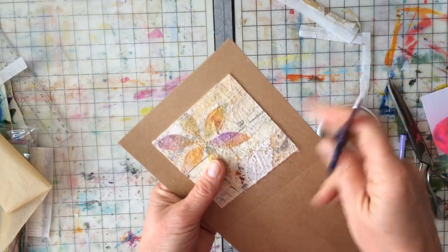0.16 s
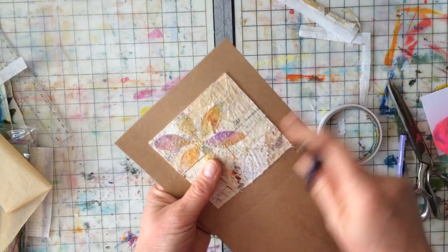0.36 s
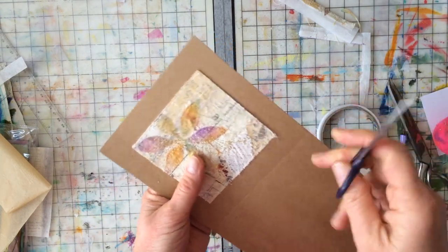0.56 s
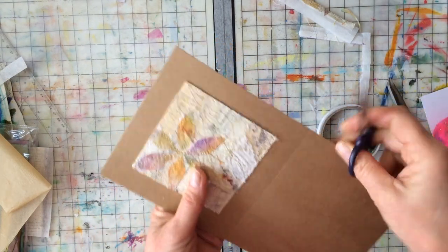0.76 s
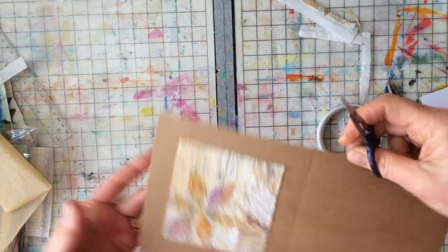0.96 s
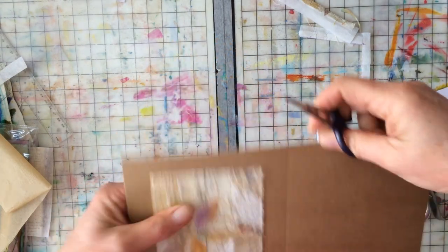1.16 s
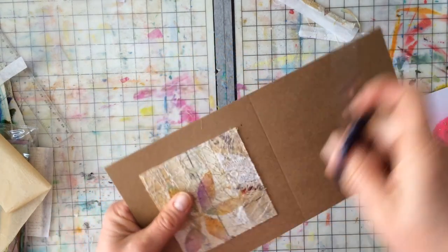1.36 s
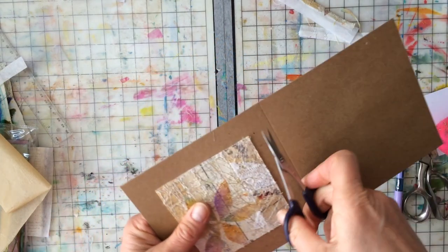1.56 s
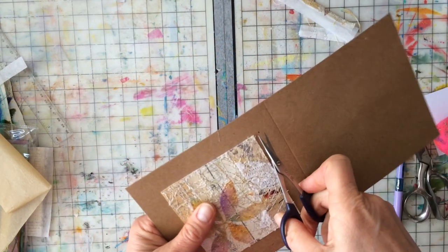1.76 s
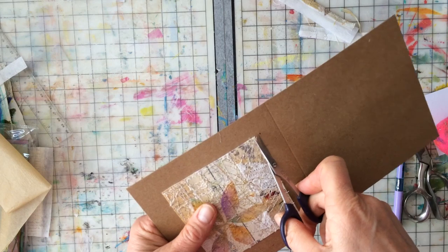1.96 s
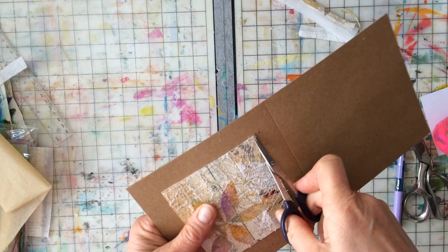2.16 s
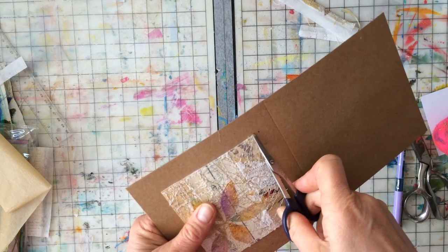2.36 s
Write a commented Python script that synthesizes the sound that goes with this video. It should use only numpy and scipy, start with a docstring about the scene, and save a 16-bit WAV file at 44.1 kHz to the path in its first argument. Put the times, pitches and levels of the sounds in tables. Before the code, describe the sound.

Close up in a quiet room, a card edge bumps and rubs against a cutting mat, hollow and papery, then brushes lightly, knocks once more, and ends with sparse, very faint small scissor and card clicks.

```python
"""In a quiet room, a hand turns a stiff card on a cutting mat and brings small scissors to the cloth on it.
The card edge knocks, scrapes and booms on the table: contact pulses and random jolts ring its resonances.
It slides with a dry hiss, made of dense random slips coloured by a spectrum.
Short bursts of bright noise make the scissor ticks and the sharp top of a hard card knock.
A short dull room tail and steady air and hiss lie behind.
"""
import sys
import numpy as np
from scipy import signal
from scipy.fft import rfft, irfft
from scipy.io import wavfile
from scipy.ndimage import uniform_filter1d

SR = 44100
rng = np.random.default_rng(int(sys.argv[2]) if len(sys.argv) > 2 else 0)


def dump_mix(stems):
    """Bounce the given channels to the path in sys.argv[1] as a 16-bit WAV at rate SR."""
    frames = np.atleast_2d(stems).T  # one column per channel
    limited = np.clip(frames, -1, 1)  # hard clip at full scale
    pcm = np.round(limited * 32767).astype(np.int16)
    wavfile.write(sys.argv[1], SR, pcm)


def volts_from_db(level):
    """Convert decibel levels to linear amplitude ratios."""
    exponent = np.asarray(level, float) / 20
    return 10 ** exponent


N = 105840  # 2.4 s

# Card edge dragged over the mat or pressed by the blades, one gain curve a bump:
# time_s, flexing_db, bend_hz, grain_db, scrape_db
BUMPS = [
    [(0.239, -38, 300, -37.5, -39), (0.262, -33.5, 192, -38.5, -38.5), (0.28, -40, 182, -58.5, -56),
     (0.29, -32, 605, -42, -57.5), (0.318, -43, 293, -64, -68), (0.33, -45, 176, -67, -86),
     (0.34, -64, 152, -70, -69), (0.352, -68, 333, -92, -79), (0.38, -64, 353, -72, -98)],
    [(0.452, -33, 237, -47.5, -60), (0.472, -39, 227, -54, -43.5), (0.49, -34.5, 230, -45, -50.5),
     (0.504, -39, 412, -54, -71), (0.514, -41.5, 290, -87, -64), (0.522, -42, 293, -52, -67),
     (0.55, -50, 163, -98, -82), (0.56, -56, 285, -82, -79), (0.584, -78, 310, -103, -77)],
    [(0.8, -76, 313, -70, -88), (0.81, -53.5, 312, -63, -74), (0.826, -81, 280, -75, -73),
     (0.844, -51, 260, -47.5, -63), (0.858, -49.5, 270, -63, -74), (0.876, -68, 308, -67.5, -63),
     (0.89, -60, 368, -58, -73), (0.9, -76, 382, -63, -86)],
    [(1.269, -50.5, 196, -60, -54), (1.295, -41.5, 336, -39, -45), (1.309, -44.5, 153, -61.5, -56),
     (1.329, -75, 149, -57.5, -62), (1.355, -69, 272, -86, -82), (1.37, -73, 274, -80, -84)],
    [(1.72, -61, 392, -49, -87), (1.728, -62, 435, -53, -69.5), (1.752, -63.5, 500, -61, -73),
     (1.768, -65, 487, -63.5, -72.5), (1.792, -60.5, 465, -69, -86), (1.81, -71, 413, -68, -75),
     (1.827, -99, 400, -89, -94)],
    [(2.15, -72, 292, -88, -80), (2.206, -69.5, 287, -66.5, -92), (2.236, -76, 268, -113, -102),
     (2.25, -62, 250, -64, -88), (2.286, -84, 273, -107, -92), (2.298, -65, 283, -69.5, -87),
     (2.33, -70, 281, -78, -88), (2.342, -63, 285, -65, -74), (2.366, -63.5, 250, -92.5, -99), ],
]
# Card and fingers sliding lightly, one gain curve a stroke: time_s, hiss_db, rumble_db
SLIDES = [
    [(0.6, -81, -90), (0.616, -68.5, -74), (0.656, -61, -76), (0.666, -57, -85), (0.694, -65, -73),
     (0.712, -62.5, -91), (0.726, -76, -102), (0.8, -65, -92)],
    [(0.89, -60, -62), (0.908, -63.5, -69), (0.938, -54.5, -77), (0.956, -51.5, -58), (0.978, -54, -76),
     (0.996, -49.5, -72), (1.025, -53, -72), (1.066, -48, -64.5), (1.086, -66, -76), (1.14, -66, -67)],
    [(1.14, -71, -80), (1.256, -51, -71.5), (1.262, -60, -78), (1.275, -42, -55)],
    [(1.41, -89, -79), (1.446, -64, -83), (1.47, -73.5, -100), (1.48, -74.5, -72.5), (1.548, -66.5, -81),
     (1.564, -65, -83), (1.592, -77, -76), (1.63, -96, -103)],
    [(1.9, -96, -76), (1.98, -73.5, -80), (2.05, -86, -78)],
]
# Blows on the card: start_s, swing_peak_db, contact_s, boom_peak_db, bend_hz
KNOCKS = [(0.2389, -27, 0.00012, -31.5, 330), (0.276, -37, 0.0003, -27, 510),
          (0.2866, -34.5, 0.00011, -37.5, 593), (0.306, -49, 0.00054, -41.5, 179),
          (0.3150, -60, 0.00032, -46.5, 316), (0.4506, -31.5, 0.00018, -33, 356),
          (0.4593, -31.5, 0.0002, -49, 513), (0.4938, -34.5, 0.00032, -27.5, 530),
          (0.5048, -68, 0.00066, -35.5, 184), (.5335, -55, 0.00047, -50.5, 182),
          (.818, -48.5, 0.0011, -56.5, 193), (.843, -42, 0.000065, -64, 200),
          (1.1064, -45, 0.00011, -74, 293), (1.2695, -49, 0.00033, -56, 300),
          (1.2940, -30, 0.000051, -43, 153), (1.7110, -54.5, 0.00014, -69, 298),
          (1.7189, -38.5, 0.00013, -59, 410), (1.748, -70, 0.00022, -57.5, 496),
          (2.204, -60, 0.000096, -61, 230), (2.248, -63.5, 0.00019, -61, 230),
          (2.340, -60.5, 0.0002, -56, 280)]
# Bright ticks: scissor blades and pivot, and the sharp top of a hard card knock:
# start_s, level_db, centre_hz
BRIGHT_TICKS = [(0.023, -56, 13400), (0.0748, -57.5, 6790), (0.2669, -32.5, 4400), (0.2868, -39, 4530),
                (0.3372, -48.5, 6240), (0.4883, -28, 6400), (0.5590, -41.5, 6100), (0.7099, -42, 14200),
                (0.87, -58, 13000), (1.294, -30.5, 4900), (1.514, -62, 3700), (1.9819, -60, 4240)]
# Low modes of the card on the table: pitch_hz, width_hz, level_db
BOOM_MODES = [(54, 38, -4.5), (98.7, 20, -2.5), (155.7, 18.5, 6.5), (187.4, 23.5, 2), (230, 22.3, 3),
              (287, 24.7, 0), (335, 36.3, -1), (454, 35, 2), (510, 34, -3.5), (608, 82, -8)]
# Middle and high modes of the card: pitch_hz, width_hz, level_db
CARD_MODES = [(780, 60, -0.5), (922, 103, 3), (1085, 198, 7.5), (1277, 180, 4.5), (1548, 114, 1.5),
              (1798, 190, 0.5), (2303, 13, 5.5), (3030, 820, -15), (4100, 570, -8)]
# Colour of the scraping edge, relative density per Hz: pitch_hz, level_db
SCRAPE_COLOUR = [(1290, -57), (2200, -3), (2750, -8.5), (3090, -1.5), (3440, -11), (5170, -6), (7970, -8),
                 (9410, -11), (16000, -15)]
# Colour of the light sliding, relative density per Hz: pitch_hz, level_db
HISS_COLOUR = [(290, -19), (500, -10.5), (750, -12), (1030, 3), (1380, -8), (1570, -1), (2610, -5.5),
               (6610, -6), (9090, -10), (14700, -12.5), (16000, -7.5)]
# Colour of the room air and microphone hiss, relative density per Hz: pitch_hz, level_db
AIR_COLOUR = [(26, -13), (45, 1.5), (251, -9.5), (411, -13), (525, -17.5), (656, -15), (1050, -16),
              (1370, -19), (3240, -24.5), (3490, -24), (16000, -31)]

JOLTS_PER_S, JOLT_SPREAD_DB, JOLT_TOP_HZ = 250, 3.0, 1110
BEND_OCTAVES, BEND_LIFT_DB = 0.3, 10.5  # modes near the bend pitch ring louder
RING_DB, RING_S = -11, 0.0061
HARD_CONTACT_S = 0.0001  # contacts longer than this give more ring against the click
CRACK_DB, CRACK_S = -11, 0.002
SLIPS_PER_S, SLIP_SPREAD_DB = 24000, 1.5
CATCHES_PER_S, CATCH_SPREAD_DB = 1500, 1.5
CATCH_SHARE = 0.35  # coarse catches against fine slips
PATCH_DB = 2.6
BLADE_HZ, BLADE_WIDTH_HZ, BLADE_DB = 7760, 26, -19.5
TICK_S, TICK_WIDTH, TICK_WIDE_DB = 0.0016, 0.24, -1.5  # width as a share of the centre pitch
ROOM_DB, ROOM_T60_S, ROOM_TOP_HZ = -18, 0.1, 5360
AIR_DB = -70
BASS_CUT_HZ, EDGE_HZ = 48, 15900


def flexing():
    """Soft jolts set the card booming; its bend decides which low modes speak."""
    jolts = clicks(JOLTS_PER_S, JOLT_SPREAD_DB) + 0.33 * rng.standard_normal(N)
    jolts = signal.sosfilt(signal.butter(4, JOLT_TOP_HZ, fs=SR, output="sos"), jolts)
    modes = body(jolts, BOOM_MODES)
    rows = np.concatenate(BUMPS)
    bend_hz = np.interp(np.arange(N) / SR, rows[:, 0], rows[:, 2])
    boom = steady(evened(bent(modes, bend_hz)), size=900)
    rumble = evened(modes.sum(0))
    return level(BUMPS, axis=1) * boom + level(SLIDES, axis=2) * rumble


def bent(modes, bend_hz):
    """Sums the low modes, lifting those near the bend pitch."""
    octaves_off = np.log2(np.array(BOOM_MODES)[:, :1] / bend_hz)
    lift = volts_from_db(BEND_LIFT_DB * np.exp(-(octaves_off / BEND_OCTAVES) ** 2))
    return (modes * lift).sum(0)


def knocks():
    """Each blow is one swing of pressure scaled by the contact time, a crack, the card's ring and its boom."""
    out, t = np.zeros(N), np.arange(5000) / SR
    noises = rng.standard_normal((len(KNOCKS), 5000))
    for (s, swing_db, contact, boom_db, bend_hz), noise in zip(KNOCKS, noises):
        u = t / contact - 4  # the push peaks four contact times in
        push = np.exp(-u ** 2 / 2)
        swing = u * np.exp(0.5 - u ** 2 / 2)  # peaks at 1
        ring = body(push * (1 + 0.13 * noise), CARD_MODES).sum(0)
        ring = ring / abs(ring).max() * np.exp(-t / RING_S)
        ring_gain = volts_from_db(RING_DB) * np.sqrt(contact / HARD_CONTACT_S)
        # a longer contact dulls the crack
        soft = np.exp(-1 / (contact * SR))
        crack = evened(signal.lfilter([1], [1, -2 * soft, soft ** 2], noise)) * np.exp(-t / CRACK_S)
        hit = swing + ring_gain * ring + volts_from_db(CRACK_DB) * crack
        boom = bent(body(push, BOOM_MODES), bend_hz)
        add(out, s, volts_from_db(swing_db) * hit + volts_from_db(boom_db) * boom / abs(boom).max())
    return out


def scraping():
    """Coarse catches ring the card's middle modes; fine slips hiss on top and make a blade sing faintly."""
    catches = clicks(CATCHES_PER_S, CATCH_SPREAD_DB)
    grain = steady(evened(body(catches, CARD_MODES).sum(0)), size=500)
    slips = fibres()
    blade = evened(resonate(slips, BLADE_HZ, BLADE_WIDTH_HZ))
    fine = patchy(coloured(slips, SCRAPE_COLOUR)) + volts_from_db(BLADE_DB) * blade
    return level(BUMPS, axis=3) * grain + level(BUMPS, axis=4) * fine


def bright_ticks():
    """Scissor steel or the top of a hard card knock: brief bright noise, part around one centre and part wide."""
    out, t = np.zeros(N), np.arange(1500) / SR
    noises = rng.standard_normal((len(BRIGHT_TICKS), 1500))
    for (s, db, hz), noise in zip(BRIGHT_TICKS, noises):
        centred = evened(resonate(noise, hz, TICK_WIDTH * hz))
        wide = evened(np.diff(noise, prepend=0))
        fizz = centred + volts_from_db(TICK_WIDE_DB) * wide
        add(out, s, volts_from_db(db) * 0.5 * fizz * np.exp(-t / TICK_S))
    return out


def sliding():
    """Dense light slips between card, skin and mat."""
    return level(SLIDES, axis=1) * patchy(coloured(fibres(), HISS_COLOUR))


def fibres():
    """Dense fine slips with coarser catches among them."""
    return clicks(SLIPS_PER_S, SLIP_SPREAD_DB) + CATCH_SHARE * clicks(CATCHES_PER_S, SLIP_SPREAD_DB)


def patchy(x):
    """Uneven fibres make the colour of a rub drift in random patches."""
    z = signal.stft(x, nperseg=256)[2]
    patches = uniform_filter1d(rng.standard_normal(z.shape), size=3, axis=0)  # across pitch
    patches = evened(uniform_filter1d(patches, size=14, axis=1))  # across time
    return evened(signal.istft(z * volts_from_db(PATCH_DB * patches), nperseg=256)[1][:N])


def room(x):
    """Table and walls return a short dull tail of decaying noise."""
    t = np.arange(SR // 3) / SR
    noise = signal.lfilter(*signal.butter(1, ROOM_TOP_HZ, fs=SR), rng.standard_normal(len(t)))
    tail = noise * volts_from_db(-60 * t / ROOM_T60_S) * (t > 0.004)  # a 4 ms gap comes first
    return volts_from_db(ROOM_DB) * signal.fftconvolve(x, tail / np.linalg.norm(tail))[:N]


def air():
    """Steady room air and microphone hiss, as coloured noise."""
    return volts_from_db(AIR_DB) * coloured(rng.standard_normal(N), AIR_COLOUR)


def clicks(per_s, spread_db):
    """Random tiny slips of random sign; a few are large."""
    size = volts_from_db(spread_db * np.minimum(rng.exponential(1, N), 4)) * rng.standard_normal(N)
    return evened(size * (rng.random(N) < per_s / SR))


def resonate(x, hz, width):
    """One two-pole resonance of gain near 1."""
    r = np.exp(-np.pi * width / SR)
    return signal.lfilter([1 - r, 0, -r * (1 - r)], [1, -2 * r * np.cos(2 * np.pi * hz / SR), r * r], x)


def body(x, modes):
    """Passes a force through resonances of alternating sign, one row of sound a mode."""
    return np.array([(-1) ** k * volts_from_db(db) * resonate(x, hz, w) for k, (hz, w, db) in enumerate(modes)])


def coloured(x, points):
    """Gives x a spectrum read on a log-frequency axis, at rms 1."""
    f, db = np.transpose(points)
    hz = np.fft.rfftfreq(len(x), 1 / SR)
    gain = volts_from_db(np.interp(np.log(hz + 1), np.log(f + 1), db))
    return evened(irfft(rfft(x) * gain, len(x)))


def evened(x):
    """Scales to rms 1."""
    return x / np.sqrt(np.mean(x ** 2) + 1e-20)


def steady(x, size):
    """Evens out the slow chance swings of a texture over a window of size samples."""
    return x / np.sqrt(uniform_filter1d(x ** 2, size) + 0.44)


def level(tables, axis):
    """Gain over time from one column of the stroke tables, silent between strokes."""
    t, out = np.arange(N) / SR, np.zeros(N)
    for rows in tables:
        s, db = np.array(rows)[:, 0], np.array(rows)[:, axis]
        edge = np.clip(np.minimum((t - s[0]) / 0.001, (s[-1] - t) / 0.002), 0, 1)  # 1 ms in, 2 ms out
        out += edge * volts_from_db(np.interp(t, s, db))
    return out


def add(mix, s, sound):
    """Mixes a sound in at time s in seconds."""
    part = mix[round(s * SR):][:len(sound)]
    part += sound[:len(part)]


def scene():
    """All handling sounds in the room over the steady air and microphone hiss."""
    near = flexing() + knocks() + scraping() + bright_ticks() + sliding()
    return (near + room(near) + air())[None]


def top_cut(x):
    """Nothing passes above the cut-off."""
    return signal.sosfilt(signal.butter(12, 16510, fs=SR, output="sos"), x)


def record(dry):
    """The microphone cuts the bass and a steep filter limits the treble."""
    bass_cut = signal.butter(2, BASS_CUT_HZ, "high", fs=SR, output="sos")
    band_limit = signal.firwin(255, EDGE_HZ, window=("kaiser", 7), fs=SR)
    mix = signal.sosfilt(bass_cut, dry)
    mix = signal.oaconvolve(mix, band_limit[None], "same")
    return top_cut(mix)


dry = scene()
out = record(dry)
dump_mix(out)
```